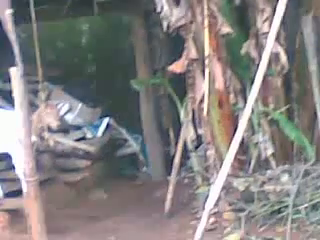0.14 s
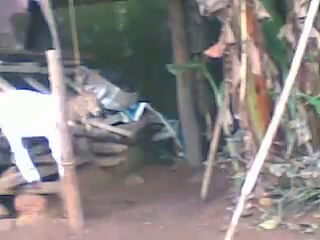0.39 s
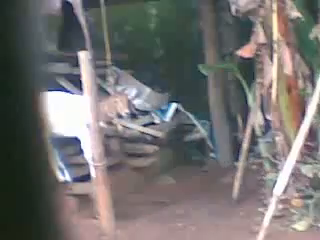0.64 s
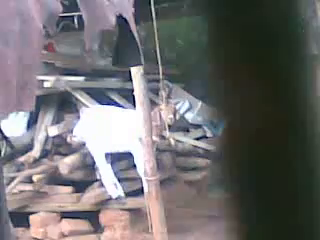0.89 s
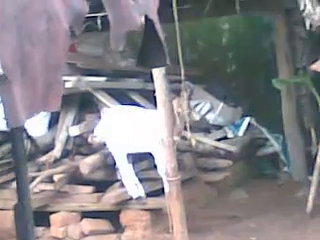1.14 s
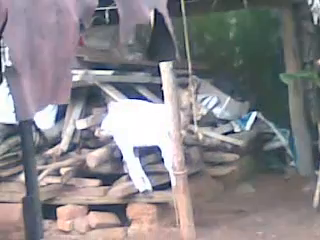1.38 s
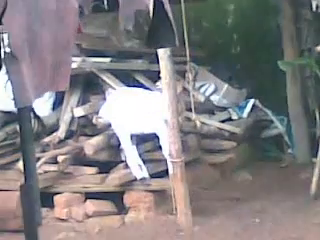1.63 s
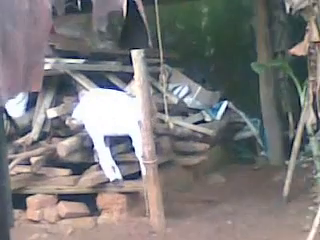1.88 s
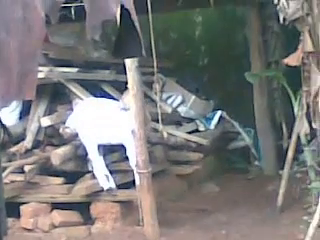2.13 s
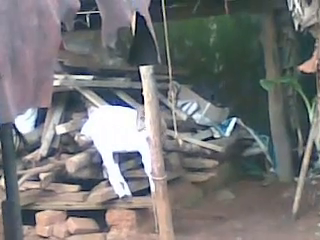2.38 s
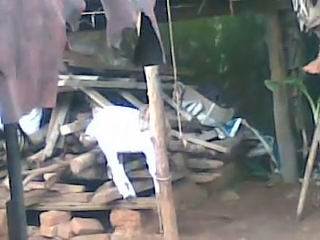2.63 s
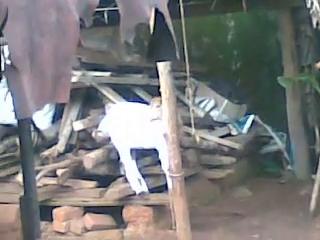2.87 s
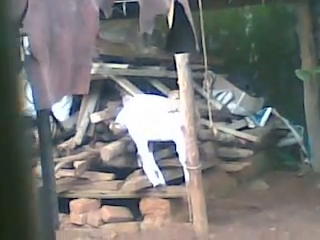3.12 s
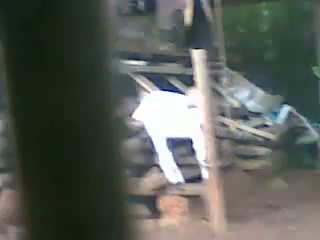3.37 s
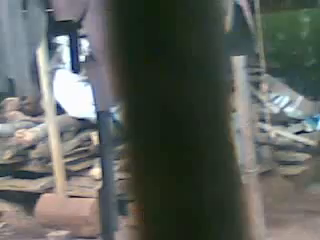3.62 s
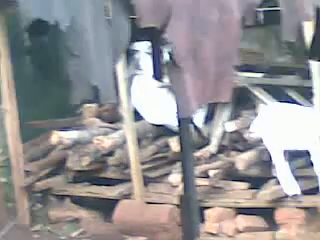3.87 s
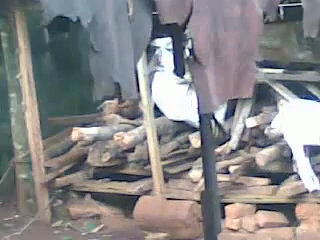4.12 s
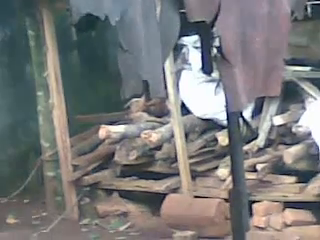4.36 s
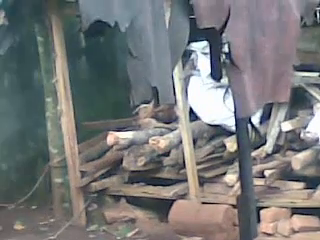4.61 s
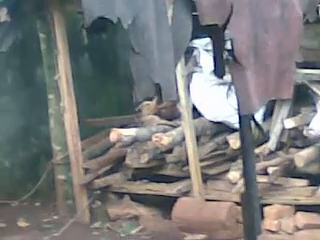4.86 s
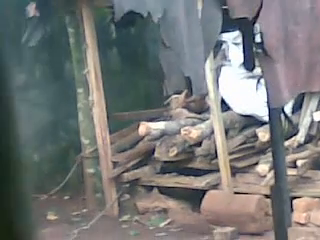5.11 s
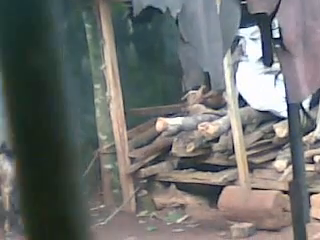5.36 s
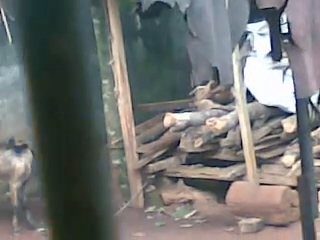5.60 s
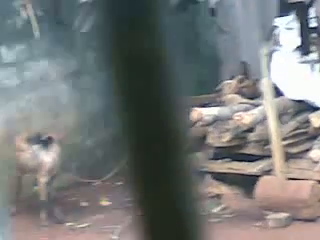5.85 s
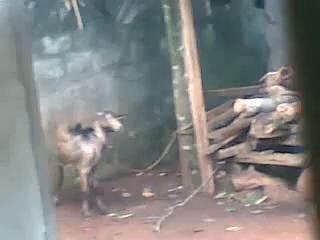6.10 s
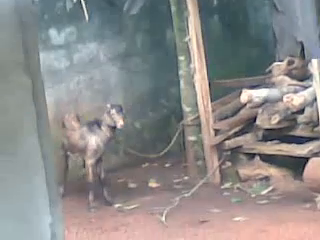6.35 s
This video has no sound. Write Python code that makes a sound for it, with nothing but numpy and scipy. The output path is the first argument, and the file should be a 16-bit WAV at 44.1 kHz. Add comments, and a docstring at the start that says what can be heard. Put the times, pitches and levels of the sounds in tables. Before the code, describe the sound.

In a walled backyard, a stiff twig broom makes three bright, scratchy strokes, with a duller rasp beneath. In the pause a distant engine hums faintly. A goat then gives one quavering bleat, and two more broom strokes follow. Far traffic and a low rumble run underneath, swelling at the end, with the steady hiss and thin whine of a small camera microphone.

```python
"""A walled backyard: far rumble and traffic wash under the hiss and thin whine of a small camera.
A stiff broom makes three strokes, slipping twigs ringing the bundle; a duller rasp comes and goes.
At 3 s a distant engine hums. At 4.1 s a goat bleats once, a hum and four quavering syllables of vocal
pulses and breath through its throat. Two more strokes follow, and the rumble swells at the end.
Throughout, the camera's slow gain control lets the background sink under loud sound."""
import sys
import numpy as np
from scipy import signal
from scipy.io import wavfile
from scipy.ndimage import uniform_filter1d

SR = 44100
rng = np.random.default_rng(int(sys.argv[2]) if len(sys.argv) > 2 else 0)


def wav_record(signal):
    """Record a signal, one row per channel, as 16-bit PCM in the file named by sys.argv[1]."""
    frames = np.transpose(np.atleast_2d(signal))
    bounded = np.clip(frames, -1, 1)
    # unit amplitude maps onto the largest positive 16-bit level
    quanta = np.round(bounded * 32767).astype(np.int16)
    wavfile.write(sys.argv[1], SR, quanta)


N = 281799


def gain_of(db):
    """Decibels to gain."""
    return 10 ** (np.asarray(db) / 20)


def unit_rms(x):
    """Scales to rms 1."""
    return x / np.sqrt(np.mean(x ** 2) + 1e-20)


def add(mix, start_s, sound):
    """Mixes a sound in at start_s."""
    part = mix[round(max(start_s, 0) * SR):][:len(sound)]
    part += sound[:len(part)]


def resonate(x, hz, width_hz):
    """Steep, movable resonance: shift hz to zero, smooth twice, shift back."""
    carrier = np.exp(2j * np.pi * np.cumsum(hz * np.ones(len(x))) / SR)
    pole = np.exp(-np.pi * width_hz / SR)
    return 2 * (carrier * signal.lfilter([(1 - pole) ** 2], [1, -2 * pole, pole * pole], x / carrier)).real


def body(x, modes):
    """Resonances of alternating sign; modes: (frequency [Hz], width [Hz], power on a flat drive [dB])."""
    return sum((-1) ** k * gain_of(db) * resonate(x, hz, width_hz) * np.sqrt(SR / (np.pi * width_hz))
               for k, (hz, width_hz, db) in enumerate(modes))


def noise(spectrum, patchy_db):
    """Coloured noise with drifting spectral patches, rms 1."""
    frames, bin_hz = N // 512 + 5, np.fft.rfftfreq(2048, 1 / SR)
    real, imag, patches = rng.standard_normal((frames, 1025, 3)).T
    patches = unit_rms(uniform_filter1d(uniform_filter1d(patches, 16, 0), 8, 1))
    hz, db = np.transpose(spectrum)
    colour_db = np.interp(np.log(bin_hz + 1), np.log(hz + 1), db, -90, -90)
    spectra = (real + 1j * imag) * gain_of(colour_db[:, None] + patchy_db * patches)
    return unit_rms(signal.istft(spectra, nperseg=2048, noverlap=1536)[1][:N])


def scratches(per_s, spread_db):
    """Sparse slips of random sign and size, of even power at any density."""
    size = gain_of(spread_db * np.minimum(rng.exponential(1, len(per_s)), 4))
    sign = rng.choice([-1, 1], len(per_s))
    return unit_rms(size * sign * (rng.random(len(per_s)) < per_s / SR) / np.sqrt(per_s))


def distance():
    """Rumble and traffic wash from beyond the yard."""
    # background levels: (time [s], rumble [dB], wash [dB])
    levels = [(0, -48, -48), (1.0, -47, -49), (2.1, -47, -50), (3.2, -49.5, -48), (4.0, -51, -46.5),
              (4.65, -44, -45), (4.8, -43.5, -47.5), (6.15, -48, -47), (6.32, -36, -45.5),
              (6.39, -36, -46.5)]
    # rumble spectrum: (frequency [Hz], relative density [dB])
    rumble_spectrum = [(12, -44), (20, -11.5), (97, 5), (109, 3), (129, -25), (150, -28), (220, -14),
                       (290, -42), (480, -120)]
    # traffic spectrum: (frequency [Hz], relative density [dB])
    wash_spectrum = [(88, -81), (150, -1), (248, -5.5), (349, -5), (460, -6), (504, -12), (749, -9.5),
                     (1300, -12.5), (1790, -13.5), (3500, -18.5), (4550, -19), (7700, -120)]
    time_s, rumble_db, wash_db = np.transpose(levels)
    t = np.arange(N) / SR
    rumble = gain_of(np.interp(t, time_s, rumble_db)) * noise(rumble_spectrum, patchy_db=1.0)
    wash = gain_of(np.interp(t, time_s, wash_db)) * noise(wash_spectrum, patchy_db=1.0)
    return rumble + wash


def camera(pulse_hz=292.98, hiss_db=-50.5):
    """Electronic hiss and circuit whine: overtones of a thin pulse train, starting in step."""
    # hiss spectrum: (frequency [Hz], relative density [dB])
    hiss_spectrum = [(880, -47), (1500, -1), (1850, -1), (2210, -15), (3480, -18), (4590, 2.5), (5020, 1),
                     (5380, -2), (6180, -1), (7390, -4), (8080, -5.5), (14900, -3.5), (16000, -0.5)]
    # whine lines: (multiple of pulse_hz, level [dB])
    overtones = [(18, -69), (19, -59.5), (21, -78), (22, -73), (23, -69), (25, -68), (26, -67.5),
                 (29, -72.5), (30, -78)]
    t = np.arange(N) / SR
    whine = sum(np.sqrt(2) * gain_of(db) * np.cos(2 * np.pi * k * pulse_hz * t) for k, db in overtones)
    return gain_of(hiss_db) * noise(hiss_spectrum, patchy_db=.4) + whine


def rasp(floor_db=-72.5):
    """Light drags over the ground: dense slips in one dull band."""
    # drags: (centre [s], half length [s], level [dB])
    drags = [(.02, 0.075, -57), (.4, 0.55, -43.5), (1.17, 0.25, -47.5), (3.8, 0.97, -58.5),
             (5.5, 0.54, -48), (6.0, 0.29, -45), (6.37, 0.12, -43.5)]
    # rasp resonances: (frequency [Hz], width [Hz], level [dB])
    modes = [(1250, 350, -7), (1680, 320, 0)]
    t = np.arange(N) / SR
    swells = sum(gain_of(db) * np.exp(-2 * ((t - mid_s) / half_s) ** 2) for mid_s, half_s, db in drags)
    return (gain_of(floor_db) + swells) * body(scratches(np.full(N, 1500.), spread_db=0.0), modes)


def broom():
    """Twigs slip singly, then in a dense hiss as pressure grows; the slips ring the bundle."""
    # strokes: (touch [s], lift [s], pressure [dB], swell [dB per tenfold time], bend [0-1],
    # main ring [Hz], ring width [Hz], handle thud [dB])
    strokes = [(0.028, 0.475, -25, 24, 0.03, 3170, 850, -29),
               (0.626, 1.039, -24.5, 15.5, 0.77, 3165, 850, -46),
               (1.264, 1.715, -27.5, 14.5, 0.89, 3040, 880, -54),
               (4.64, 5.044, -22.5, 14, 0.32, 3004, 940, -33),
               (5.262, 5.661, -29, 11, 0.01, 3030, 1150, -31)]
    # twig tip resonances: (frequency [Hz], width [Hz], level [dB])
    tip_modes = [(4430, 240, -18.5), (5990, 1300, 4.5), (7080, 660, 2), (7880, 1130, -0.5),
                 (10100, 3200, -2.5)]
    # twig resonances: (multiple of twig_hz, width [Hz], level [dB])
    twig_modes = [(.88, 300, -4), (1.0, 280, 0), (1.2, 500, -6), (2.05, 900, -8)]
    # handle resonances: (frequency [Hz], width [Hz], level [dB])
    handle_modes = [(750, 130, 3), (890, 200, 0), (1590, 140, 2)]
    lift_db_per_s, tail_s, flick_s = -380, .2, .018
    straight_hz, slack_hz, slack_s = 1932, 1305, .052
    out = np.zeros(N)
    for touch_s, lift_s, peak_db, swell_db, max_bend, loose_hz, width_hz, thud_db in strokes:
        t = np.arange(touch_s, lift_s + tail_s, 1 / SR)
        along = np.clip((t - touch_s) / (lift_s - touch_s), .01, .999)
        press_db = peak_db + swell_db * np.log10(np.sin(np.pi / 2 * along))
        press_db += lift_db_per_s * np.maximum(t - lift_s, 0)
        press_db += 6 * max_bend * np.exp(-((t - lift_s) / flick_s) ** 2)  # a bent bundle flicks on lifting
        bend = max_bend * np.exp(-((along - .76) / .25) ** 2)
        fullness = np.sin(np.pi * along ** 1.5) ** .7
        slack = np.clip((t - lift_s) / slack_s + .5, 0, 1)
        ring_hz = loose_hz + 280 * fullness + 403 * bend
        twig_hz = (straight_hz + 486 * bend) * (1 - slack) + slack_hz * slack
        slips_per_s = np.clip(4000 * gain_of(1.4 * (press_db + 25)), 400, 9000)
        slips = scratches(slips_per_s, spread_db=-2.5)
        ring = body(slips, [(ring_hz, width_hz, -2)]) + body(slips, [(1.05 * ring_hz, 2 * width_hz, -7)])
        fixed_ring = body(slips, [(2880, 560, -17.0), (3520, 110, -11.5)])
        rings = gain_of(-1.5 * bend) * (ring + fixed_ring)
        tips = gain_of(-21 + 3.5 * fullness + 4 * bend) * body(slips, tip_modes)
        twigs = body(slips, [(k * twig_hz, width, db) for k, width, db in twig_modes])
        twigs *= gain_of(-20 + 14 * bend + 3 * max_bend * slack)
        handle = gain_of(thud_db + 8 * (1 - along) ** 2) * body(slips, handle_modes)
        envelope = gain_of(press_db) * signal.windows.tukey(len(t), .03)
        add(out, touch_s, envelope * (rings + tips + twigs + handle))
    return out


def twig_catches(rise_s=.0004):
    """Single twigs catch and tick as a stroke begins."""
    # ticks: (time [s], level [dB])
    catches = [(0.6524, -25), (0.6654, -35), (0.6789, -30), (0.6974, -25), (1.2945, -30), (1.3079, -22),
               (5.2694, -22), (5.2824, -24), (5.2954, -20), (5.3063, -27), (5.3124, -28), (5.3234, -26),
               (5.3527, -26), (5.3644, -16)]
    t = np.arange(300) / SR
    ring = (np.sin(2 * np.pi * 3300 * t) + .6 * np.sin(2 * np.pi * 2400 * t)) / 1.5
    tick = t / rise_s * np.exp(1 - t / rise_s) * ring
    out = np.zeros(N)
    for time_s, db in catches:
        add(out, time_s, gain_of(db) * tick)
    return out


def engine(waver_db=2.3):
    """Low firing orders of a far engine, each wavering in level."""
    # engine run: (time [s], second order [Hz], level [dB])
    run = [(3.0, 74.6, -22), (3.1, 74, -57.5), (3.19, 66.6, -46.5), (3.45, 69.4, -53.5), (3.54, 69.4, -47),
           (3.78, 69.4, -49), (4.0, 66.7, -53), (4.3, 66.6, -53)]
    # orders: (multiple of firing rate, level [dB])
    orders = [(1, -13), (2, 5.5), (3, -5), (4, -7), (5, -11), (6, -23), (8, -17.5), (10, -12)]
    time_s, second_hz, level_db = np.transpose(run)
    t = np.arange(time_s[0], time_s[-1], 1 / SR)
    turns = np.cumsum(np.interp(t, time_s, second_hz) / 2) / SR
    tone, out = np.zeros(len(t)), np.zeros(N)
    for k, db in orders:
        waver = unit_rms(uniform_filter1d(rng.standard_normal(len(t)), 3000))
        tone += gain_of(db + waver_db * waver) * np.sin(2 * np.pi * (k * turns + rng.random()))
    envelope = gain_of(np.interp(t, time_s, level_db)) * signal.windows.tukey(len(t), .2)
    add(out, t[0], np.sqrt(2) * envelope * tone)
    return out


def goat():
    """Vocal pulses and breath puffs pass the throat; the jaw holds its lowest resonance on harmonic 2."""
    # closed-mouth hum, four syllables, faint afterbeat: (start [s], length [s], rise [s],
    # mouth opening [s], effort [dB], top pitch [Hz], upper resonances [dB], breath [dB])
    syllables = [(4.113, 0.31, .075, 0.057, -40.5, 374.6, -34, -3),
                 (4.211, 0.11, 0.05, 0.024, -27, 420.4, -6, 3.5),
                 (4.315, 0.104, .037, .012, -23.5, 428.2, -5, 2.5),
                 (4.403, 0.103, .033, .014, -23, 451.4, -3, 3.5),
                 (4.503, 0.14, 0.038, 0.0094, -21.5, 450, -3.5, -1),
                 (4.628, 0.062, 0.0223, 0.017, -30, 454.6, -10, 0)]
    # upper resonances: (frequency [Hz], width [Hz], level [dB])
    upper_modes = [(920, 140, -10), (1720, 480, -5), (2167, 140, 2.5), (2920, 1200, -8.5), (3490, 960, 2.5),
                   (5940, 2500, -6)]
    # breath resonances: (frequency [Hz], width [Hz], level [dB])
    breath_modes = [(960, 326, -6.5), (1450, 890, -12.5), (2240, 380, -8.5), (3510, 1130, -4),
                    (5950, 2100, -13), (6870, 3400, -17.5)]
    onset_ratio, onset_db, sag_hz_per_s, fall_db_per_s = .855, -8, -160, -380
    upper_lead, breath_hold = .3, .91  # shares of the rise and of the fall skipped
    out = np.zeros(N)
    for start_s, length_s, rise_s, open_s, peak_db, top_hz, upper_db, breath_db in syllables:
        t = np.arange(0, length_s, 1 / SR)
        climb, past_peak_s = np.minimum(t / rise_s, 1), np.maximum(t - rise_s, 0)
        mouth = np.minimum(t / open_s, 1) ** 2
        rise_db, fall_db = peak_db + onset_db * (1 - climb), fall_db_per_s * past_peak_s
        hz = top_hz * (onset_ratio + (1 - onset_ratio) * climb) + sag_hz_per_s * past_peak_s
        jitter = .16 * uniform_filter1d(rng.standard_normal(len(t)), 100)
        turns = np.cumsum(hz * (1 + jitter)) / SR
        folds = unit_rms(sum(np.cos(2 * np.pi * k * turns) for k in range(1, 22)))
        uneven = 1 + .081 * np.cos(np.pi * turns)  # every second pulse weaker
        puffs = unit_rms((.52 + np.exp(-(turns % 1) / .25)) * rng.standard_normal(len(t)))
        low = unit_rms(resonate(folds, 2 * hz, 190) + gain_of(-15.5) * resonate(folds, hz, 150))
        low *= gain_of(rise_db + fall_db)
        upper_gain = gain_of(rise_db + fall_db + upper_db - upper_lead * onset_db * (1.5 - climb))
        upper = body(upper_gain * mouth * uneven * folds, upper_modes)
        breath_gain = gain_of(rise_db + breath_db + (1 - breath_hold) * fall_db)
        breath = body(breath_gain * mouth * puffs, breath_modes)
        add(out, start_s, (low + upper + breath) * signal.windows.tukey(len(t), .15))
    return out


def yard(x):
    """Sparse echoes of random sign from walls and woodpile, each band dying at its own rate."""
    # echo decay: (frequency [Hz], t60 [s])
    decay = [(200, 0.08), (900, 0.25), (2000, 0.35), (3500, 0.38), (6000, 0.32), (12000, 0.15)]
    taps = np.zeros(SR // 2 + SR // 4)
    slots = np.arange(300, len(taps) - 20, 20)
    taps[slots + rng.integers(0, 20, len(slots))] = rng.choice([-1., 1.], len(slots))
    bin_hz, t, spectra = signal.stft(taps, SR, nperseg=256)
    hz, t60_s = np.transpose(decay)
    bin_t60_s = np.interp(np.log(bin_hz + 1), np.log(hz), t60_s)
    tail = signal.istft(spectra * gain_of(-60 * t / bin_t60_s[:, None]), SR, nperseg=256)[1]
    return signal.fftconvolve(x, tail / np.linalg.norm(tail))[:N]


def scene():
    """Broom and goat with their echoes over the background."""
    bleat, sweep = goat(), broom() + twig_catches()
    echoes = yard(gain_of(0.9) * sweep + gain_of(-7.5) * bleat)
    return (sweep + bleat + echoes + rasp() + engine() + distance() + camera())[None]


def record(dry):
    """Slow gain control, then the band limit."""
    threshold_db, cut_db_per_db, lag_s, edge_hz = -38.5, .47, .6, 15750
    power_db = 10 * np.log10(abs(uniform_filter1d(dry[0] ** 2, 2000)) + 1e-12)
    pole = np.exp(-1 / (lag_s * SR))
    over_db = signal.lfilter([1 - pole], [1, -pole], np.maximum(power_db - threshold_db, 0))
    ducked = dry / gain_of(cut_db_per_db * over_db)
    lowpass = signal.firwin(511, edge_hz, window=("kaiser", 9), fs=SR)
    return signal.oaconvolve(ducked, lowpass[None], "same")


dry = scene()
out = record(dry)
wav_record(out)
```